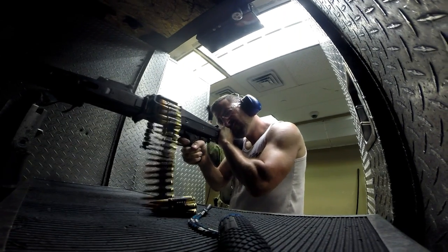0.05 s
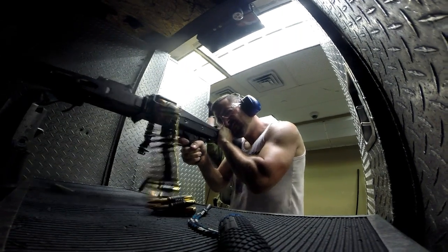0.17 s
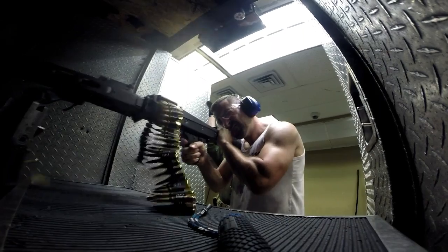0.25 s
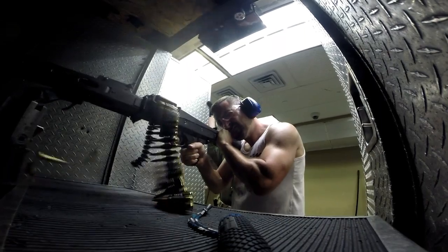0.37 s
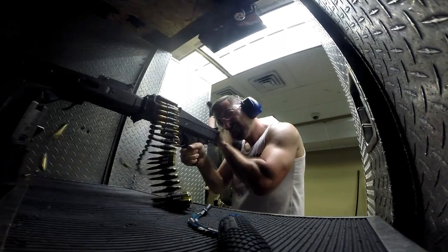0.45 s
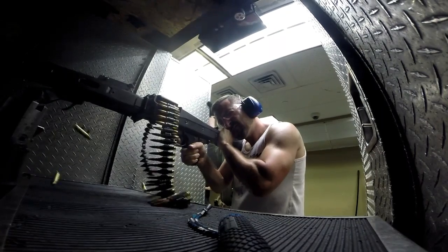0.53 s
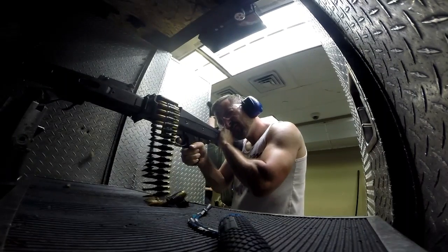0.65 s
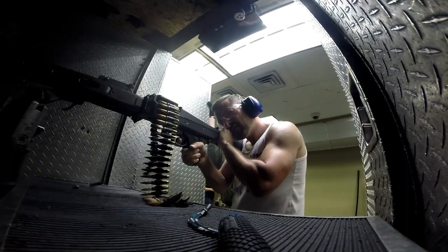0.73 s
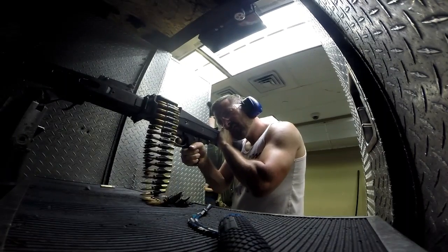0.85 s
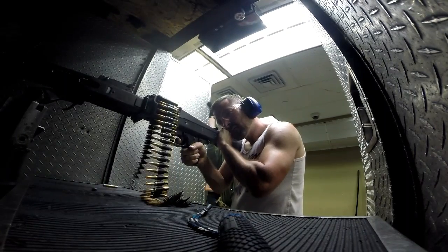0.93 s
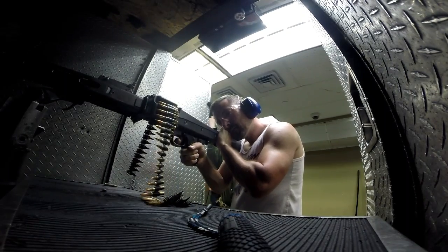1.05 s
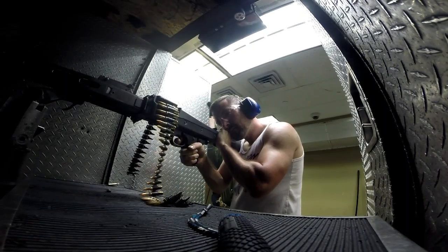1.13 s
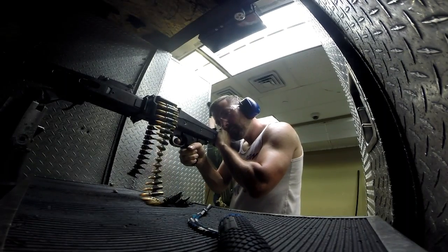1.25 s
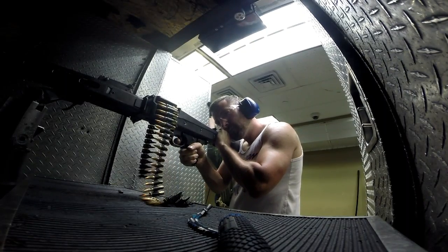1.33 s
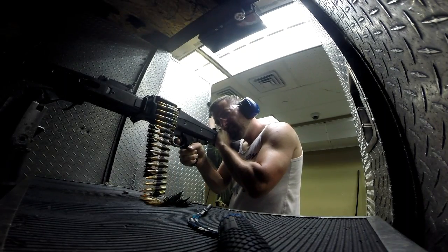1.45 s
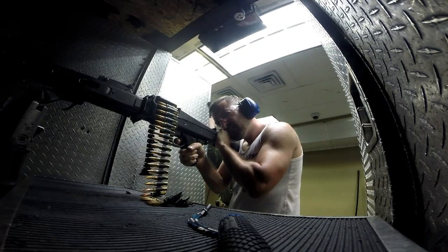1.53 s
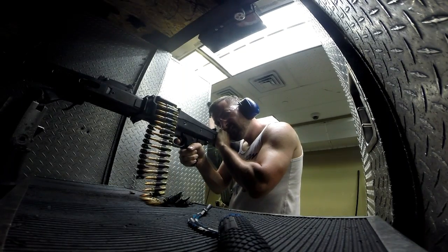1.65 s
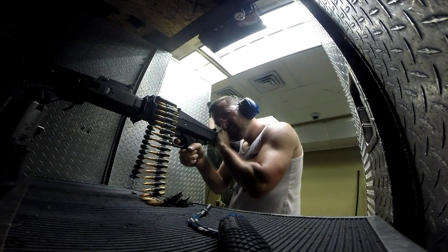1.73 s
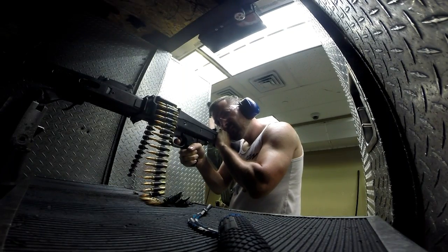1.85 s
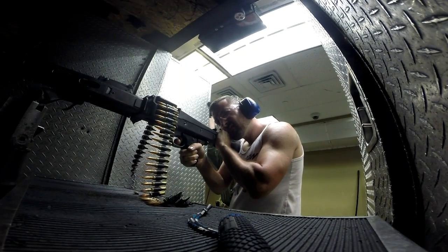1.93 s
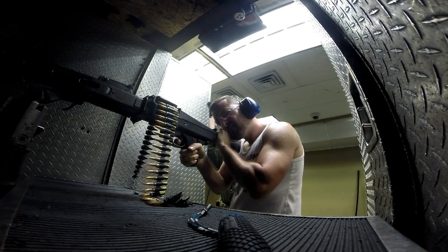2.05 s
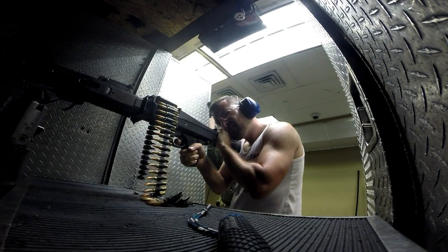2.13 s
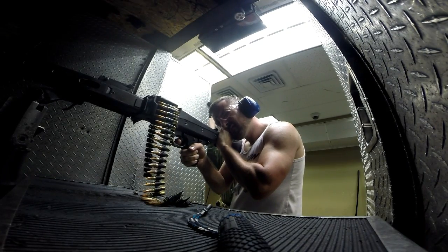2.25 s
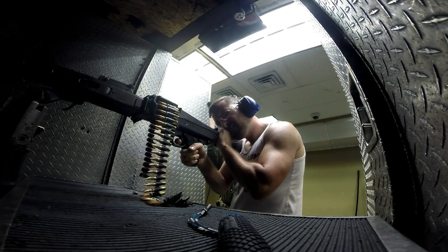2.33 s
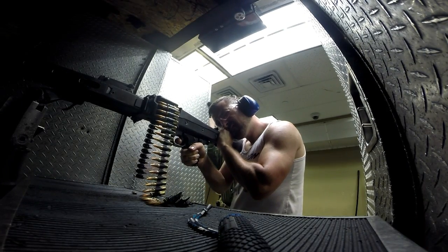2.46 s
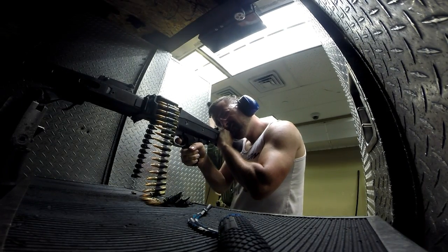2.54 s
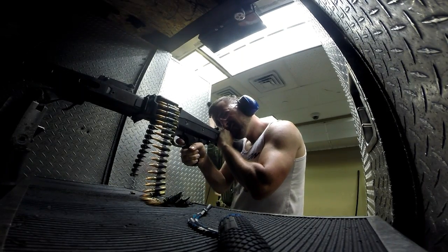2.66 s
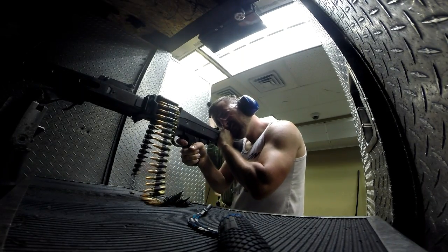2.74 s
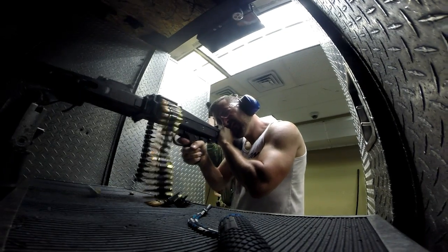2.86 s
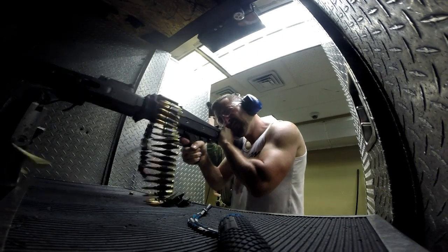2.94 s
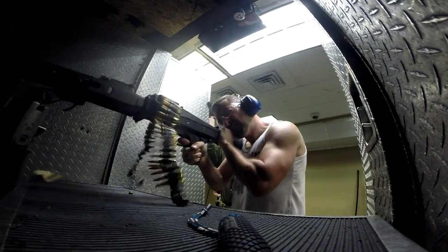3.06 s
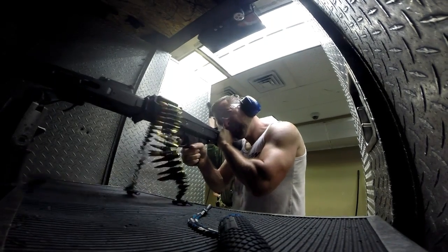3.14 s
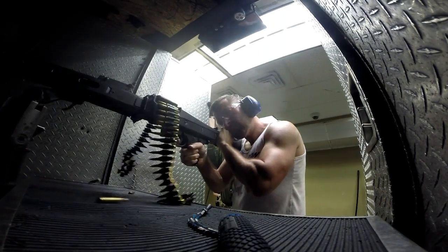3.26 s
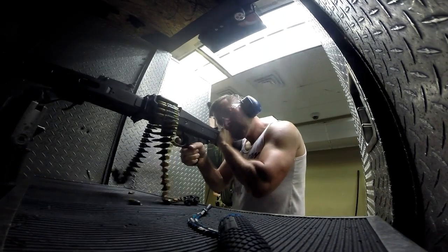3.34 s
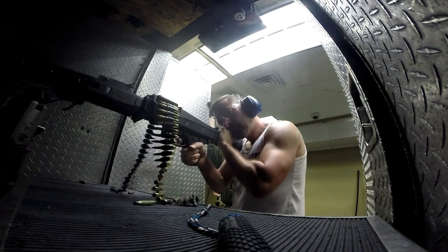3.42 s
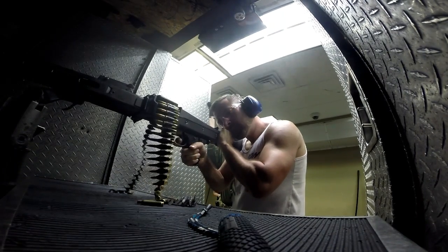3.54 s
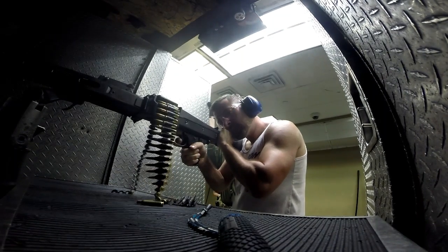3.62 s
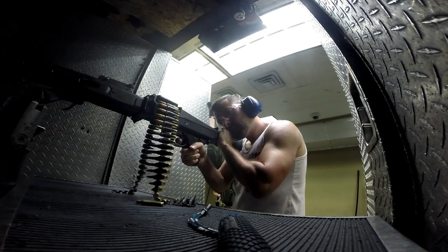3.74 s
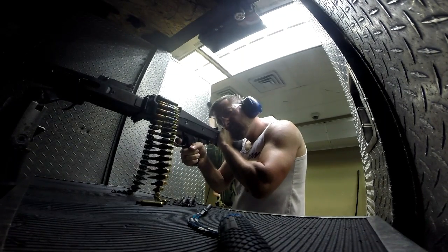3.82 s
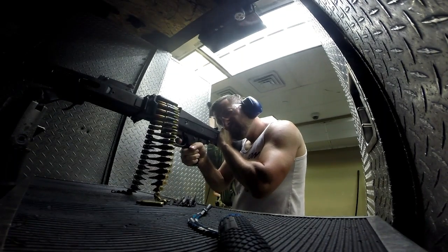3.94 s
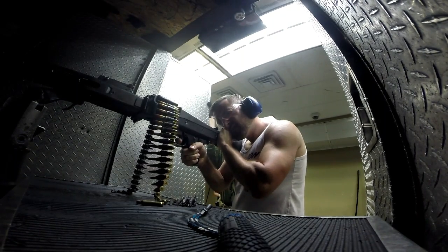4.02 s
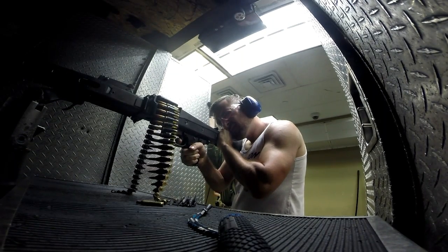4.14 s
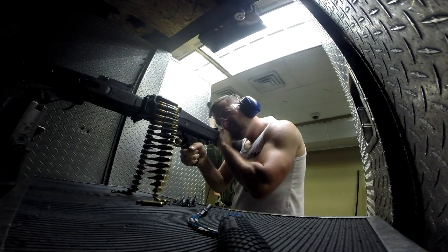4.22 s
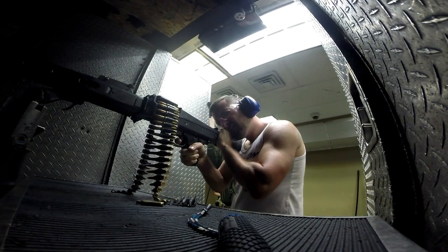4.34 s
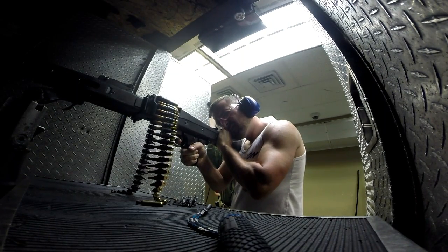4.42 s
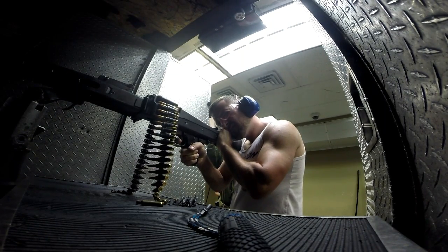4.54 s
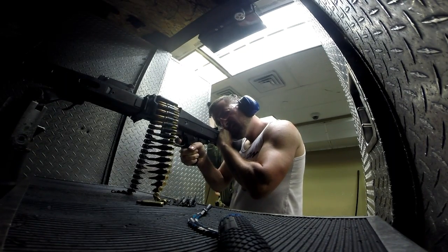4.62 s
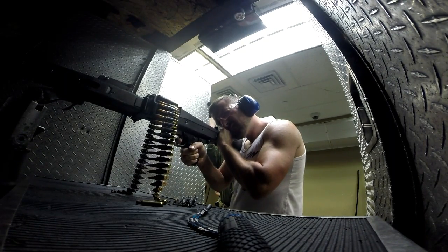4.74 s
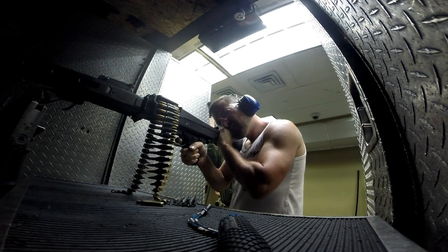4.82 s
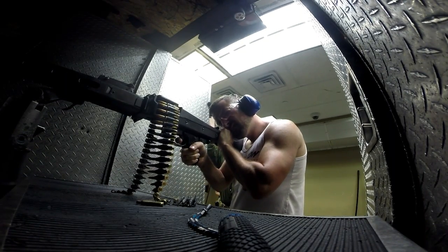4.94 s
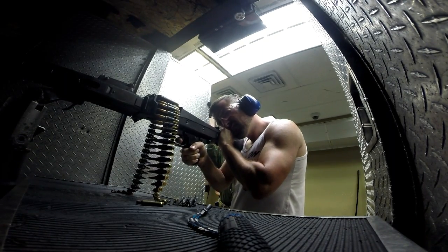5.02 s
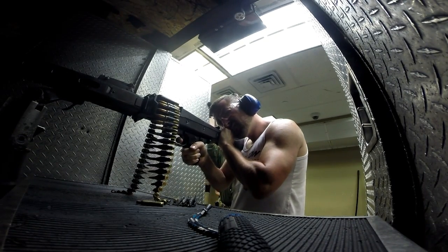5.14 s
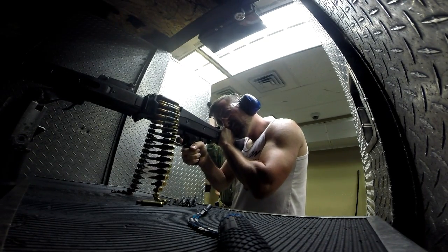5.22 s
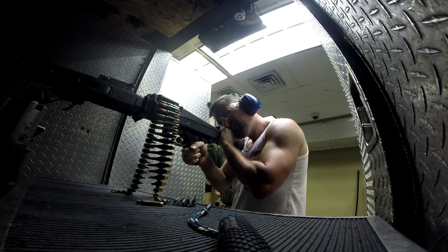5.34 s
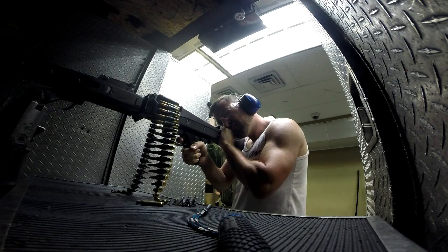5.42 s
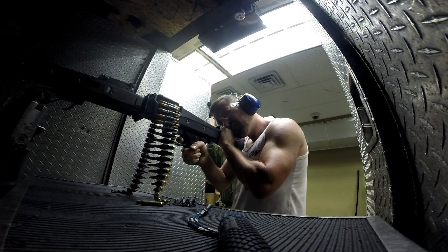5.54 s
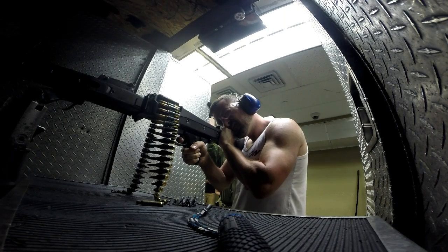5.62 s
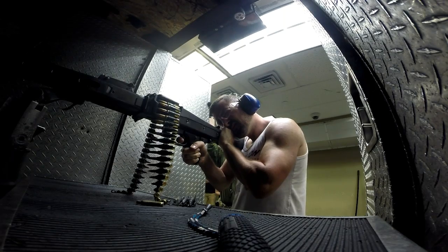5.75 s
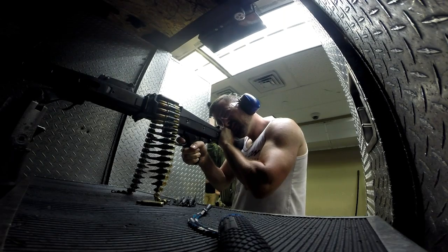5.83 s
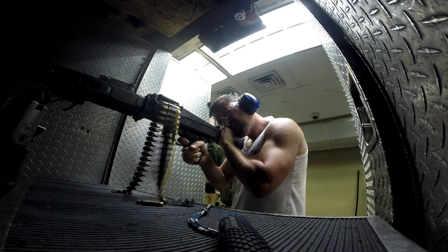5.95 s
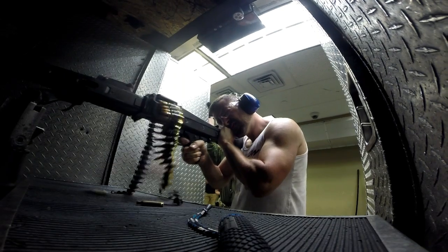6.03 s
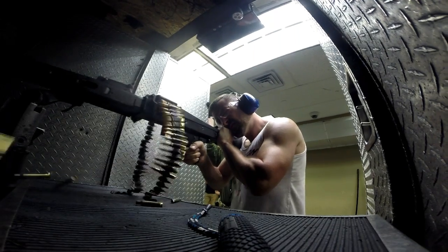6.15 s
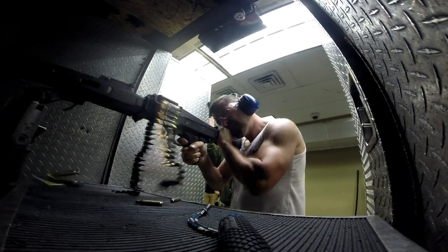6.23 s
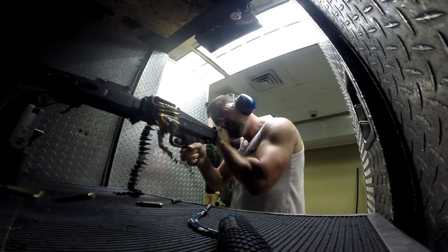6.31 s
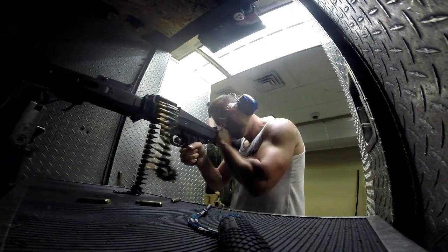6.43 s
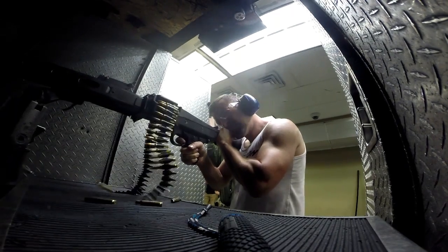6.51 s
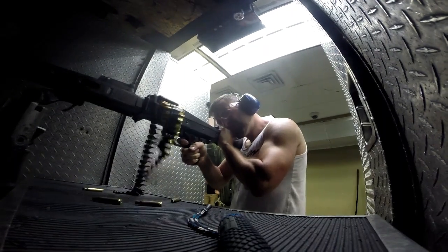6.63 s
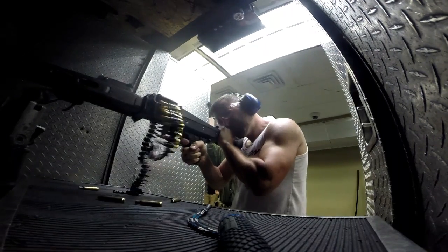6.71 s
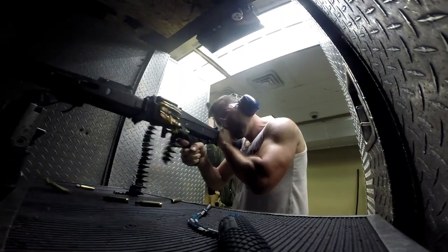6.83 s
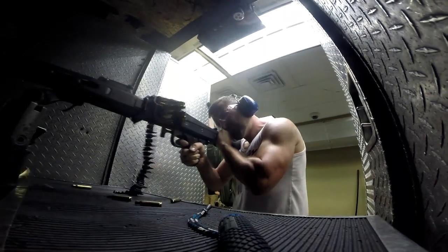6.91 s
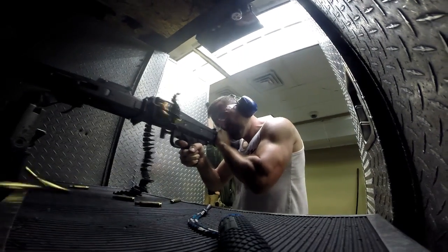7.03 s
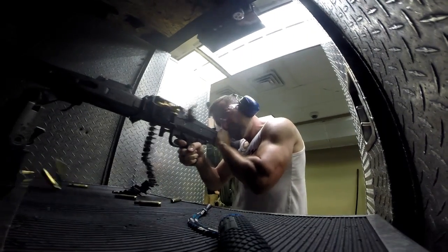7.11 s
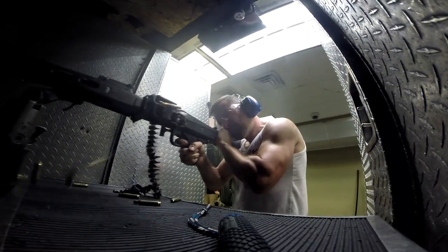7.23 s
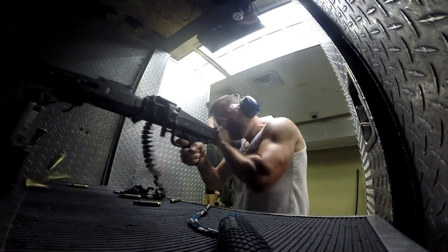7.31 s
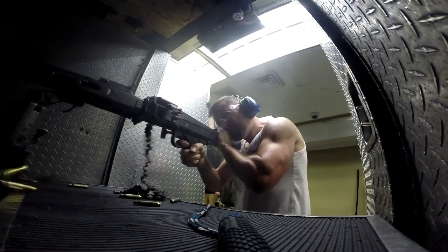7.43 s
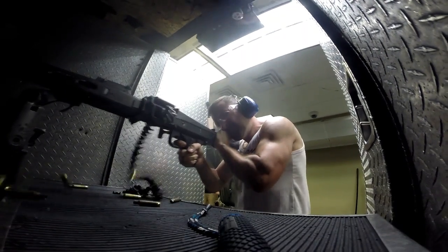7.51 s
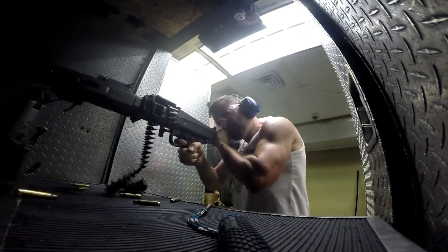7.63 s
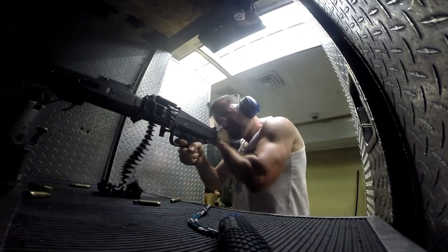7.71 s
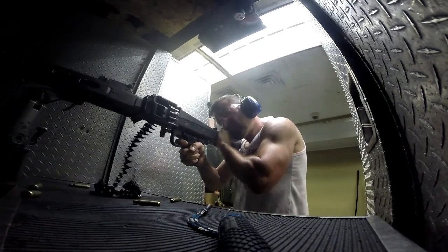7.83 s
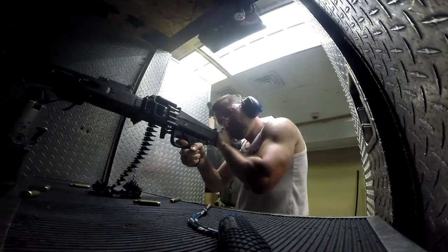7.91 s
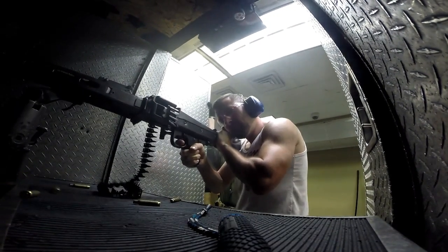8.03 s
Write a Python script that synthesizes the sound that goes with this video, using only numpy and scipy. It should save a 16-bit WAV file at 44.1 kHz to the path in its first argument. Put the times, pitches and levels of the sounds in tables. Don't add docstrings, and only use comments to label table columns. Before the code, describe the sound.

A belt-fed machine gun fires rapid distorted bursts in a steel indoor range booth, each ringing out into belt clatter, faint brass clinks and low rumble.

```python
import sys
import numpy as np
from scipy import signal
from scipy.fft import rfft, irfft, next_fast_len
from scipy.io import wavfile
from scipy.ndimage import uniform_filter1d

SR = 44100
rng = np.random.default_rng(int(sys.argv[2]) if len(sys.argv) > 2 else 0)


def pcm_store(signal):
    levels = np.round(np.clip(np.atleast_2d(signal), -1, 1) * 32767)
    wavfile.write(sys.argv[1], SR, levels.astype(np.int16).T)


def attenuation_scalar(level_db):
    decades = np.asarray(level_db, float) / 20
    return 10 ** decades


N = 355887

# time in seconds, peak in dB.
OPENING = [
    (0.1297, -12),
    (2.9227, -13),
    (6.088, -14),
    (6.7319, -17),
]
# time in seconds, peak in dB.
FOLLOWING = [(0.1879, -0.5), (0.248, -1), (0.308, -1), (0.37, -2), (0.4284, -3), (2.981, 0.5),
             (3.0402, -1.5), (3.1004, -2), (3.1642, 1.5), (3.224, -2), (6.147, -1), (6.209, -2),
             (6.2711, -2.5), (6.3297, -2), (6.394, -2), (6.789, -3), (6.853, -3), (6.912, -0.5),
             (6.9739, -2), (7.0353, -3), (7.096, -3), (7.1588, -2), (7.2255, -2), (7.2839, -0.5),
             (7.3456, -5.5), (7.4053, -3), (7.467, -2.5), (7.5262, -2.5), (7.5882, -4.5), (7.65, -4)]
SHOTS = sorted(OPENING + FOLLOWING)
# time in seconds, peak in dB.
FAR_SHOT = [(5.2318, -2)]
# start in Hz, top in Hz, level over the ring in dB.
SWEEPS = [(1007, 2600, 5.5), (997, 2300, 1), (912, 3000, 3), (980, 1100, 4)]
# frequency in Hz, width in Hz, level in dB.
CASE_MODES = [(1226, 540, 1.5), (1840, 500, -3.5), (2590, 700, -2.5), (3400, 706, -12.5),
              (5070, 550, -12.5), (282, 1440, -13.5)]
# frequency in Hz, width in Hz, level in dB.
BOOTH_AIR = [(767, 17, 12.5), (997.4, 25.4, 6), (1130, 76, 4), (1573, 54, 2.5), (1964, 22.4, 7),
             (2334, 70, 6)]
# delay in seconds, level in dB.
WALL_ECHOES = [(0.0098, -12.5), (0.016, -11), (0.018, -10), (0.022, -17.5), (.0275, -46), (.035, -36),
               (0.045, -27.5)]
# frequency in Hz, spread in Hz, level in dB, T60 in seconds.
PANELS = [(542.3, 17, -42.5, 3.26), (716.3, 13, -39.5, 3.42), (1290, 75, -27, 2.2), (1218, 30, -37, 1.2),
          (2230, 170, -41.5, 3.1), (97.3, 10, -19, 0.73), (963, 25, -34.5, 0.46)]

# frequency in Hz, level in dB.
HALL_SPECTRUM = [(110, -19), (180, -4), (239, -9), (367, -4.5), (460, -3.5), (506, -3.5), (922, -10.5),
                 (1270, -3), (1470, -13.5), (2540, -13.5), (3630, -25.5), (4140, -21.5), (8450, -37),
                 (14300, -47), (16000, -55.5)]
# frequency in Hz, T60 in seconds.
HALL_T60 = [(200, 1.45), (500, 1.116), (1300, 1.06), (3000, 1.084), (6000, 0.83), (15000, 0.58)]
# frequency in Hz, level in dB.
FAR_SPECTRUM = [(35, -31), (60, -23), (85, -0.5), (124, -26), (250, -4), (294, -10), (593, -7.5), (666, -7),
                (767, -7), (1280, -2.5), (1780, -19.5), (2350, -14), (16000, -50.5)]
# frequency in Hz, T60 in seconds.
FAR_T60 = [(100, 0.33), (300, 1), (1000, 1), (3000, 0.88), (8000, 0.69)]

# start in seconds, travel in seconds, final level in dB.
BOLT_RUNS = [
    (0.077, 0.036, -24.5),
    (2.871, 0.043, -25.5),
    (6.036, 0.0392, -29),
]
# start in seconds, length in seconds, scrape in dB, low shove in dB.
LOCKS = [
    (0.1123, 0.0094, -14.5, -15),
    (2.908, 0.011, -24.5, -30),
    (6.073, 0.0045, -26.5, -34),
]
# time in seconds, level in dB.
FEED_SNAPS = [(0.273, -21), (0.3254, -30), (0.3991, -30), (2.9477, -23), (3.0656, -28.5), (3.193, -23.5),
              (6.1138, -27), (6.1762, -28.5), (6.2342, -30), (6.2912, -32.5), (6.3602, -24), (6.7573, -25),
              (6.8818, -23), (6.999, -29), (7.0532, -34), (7.121, -22), (7.1799, -35), (7.376, -27),
              (7.4304, -23), (7.5547, -27), (7.608, -36.5), (7.6676, -25)]
# start in seconds, length in seconds, level in dB.
BELT_SLIDES = [(1.215, 0.025, -35.5), (1.269, 0.022, -42), (1.338, 0.16, -41), (1.604, 0.05, -48.5),
               (3.79, 0.033, -46), (3.86, 0.025, -55), (4.205, 0.046, -57), (4.328, 0.02, -63),
               (4.363, 0.079, -59), (4.565, 0.093, -63), (7.88, 0.012, -32.5), (7.915, 0.014, -40)]
# time in seconds, peak in dB, low part in dB, rise in seconds.
KNOCKS = [(0.56, -7.5, 6.5, 0.003), (0.6527, -16, 4, 0.0023), (0.67, -2.5, 7, 0.0018),
          (0.692, -13, -10, 0.0037), (0.7498, -19.5, 13, 0.0059), (0.849, -20, 17, 0.0031),
          (1.2204, -12.5, 8, 0.0058), (1.264, -21.5, -2, 0.0091), (1.353, -19, 4, 0.0051),
          (2.097, -27.5, 3, 0.0086), (2.8828, -13, -10, 0.0015), (3.19, -13, 2, 0.0019),
          (3.286, -12, 4.5, 0.003), (3.7646, -20, 7, 0.0046), (3.803, -24, 6.5, 0.0053),
          (6.0387, -23.5, -14, 0.0058), (7.885, -11, 3, 0.0032), (7.897, -17, 12, 0.0021),
          (7.94, -17, 13, 0.0034), (7.948, -21, 10, 0.0015), (7.9245, 0, 4, 0.0036)]
# time in seconds, peak in dB, low part in dB.
TAPS = [(0.868, -37, 19), (1.0254, -36, 19.5), (1.0993, -40.5, 24.5), (1.3805, -26, 10), (1.407, -31.5, 1),
        (1.4425, -31.5, 20), (1.6103, -35, 2), (1.722, -41.5, 13.5), (1.7946, -43, 9), (1.851, -40.5, 4),
        (1.923, -45, 10), (2.0154, -39.5, 8.5), (2.3434, -44, -13), (2.5344, -32.5, 3), (2.732, -44.5, -5),
        (3.6782, -32, 3), (3.8686, -36.5, 17), (4.221, -31, -1), (4.2745, -39, 4), (4.322, -37, 3),
        (4.3994, -42, 0), (4.62, -34.5, -2), (4.8302, -41, -4), (4.9333, -43, -2), (4.984, -44, -10),
        (0.902, -39, 16), (1.158, -47, 25), (1.284, -33, 0), (1.47, -31, 11), (1.497, -35, 0),
        (2.495, -46, 0), (3.657, -27, 2), (3.733, -43, 0), (4.068, -44.5, -5), (4.088, -43, -5),
        (4.137, -46, -5), (4.386, -44.5, 0), (4.532, -48, -5), (4.587, -42.5, 0), (6.5772, -33, 17),
        (7.9658, -21, 11)]
TAP_RISE_S = 0.0059
# frequency in Hz, width in Hz, level in dB.
LINK_MODES = [(2800, 130, -14.5), (4080, 190, 17), (4750, 280, 12.5), (5360, 215, 7.5), (6180, 200, -2.5),
              (9000, 7600, -26.5)]
# frequency in Hz, width in Hz, level in dB.
BENCH_MODES = [(780, 640, -6.5), (1525, 387, 1.5), (1887, 550, -3.5), (2533, 320, -1.5)]

# time in seconds, peak in dB, low mode in Hz, high mode in Hz, high mode in dB.
CLINKS = [(0.0094, -53, 9000, 12900, -14), (1.3088, -45, 8110, 12100, -18), (1.612, -55, 8850, 14200, 11),
          (1.6294, -48.5, 8820, 14000, 5), (1.7194, -54, 8820, 12200, -3), (1.851, -54, 8650, 12200, -22),
          (2.0172, -64.5, 8860, 10800, -19), (2.098, -42.5, 8570, 11160, -2.5),
          (2.3394, -64, 8970, 10830, 12), (2.494, -53.5, 9100, 12120, -4), (2.536, -42, 9000, 11536, -4),
          (2.734, -45.5, 8950, 12129, -17), (3.678, -61, 8860, 14100, 12),
          (3.7883, -56, 7950, 14100, -13.5), (4.137, -51, 7630, 11600, -25), (4.22, -39.5, 8600, 13850, -1),
          (4.223, -46, 11500, 14126, 12), (4.3576, -47, 9050, 13900, -9), (4.3994, -49, 8700, 14200, 0),
          (4.5345, -53, 8600, 14100, -2), (4.5645, -51, 8950, 11200, 8), (4.624, -44, 7250, 13900, 3),
          (4.9357, -65, 7500, 11200, 7), (7.9923, -50.5, 8450, 14300, -18)]
# frequency in Hz, level in dB.
BRASS_MODES = [(7700, 3), (8800, 3.5), (10150, -5.5), (11550, -8), (12150, -22), (12700, 2), (14150, -5.5)]
# time in seconds, frequency in Hz, peak in dB, T60 in seconds.
PINGS = [(2.565, 6210, -47, .08), (3.79, 8140, -54, .7), (4.56, 3500, -58, .2), (4.765, 2600, -52, .45),
         (4.565, 15100, -64, .3), (4.273, 1680, -34, .04), (.562, 820, -22, .05), (.67, 1280, -15, .06),
         (.851, 1520, -21, .06), (1.068, 1070, -29, .08), (2.886, 2600, -19, .025), (3.762, 4200, -35, .07),
         (3.801, 4200, -35, .07), (1.222, 1500, -21, .06), (1.355, 5380, -47, .15), (1.405, 5380, -47, .25),
         (2.5, 12715, -72, .5), (2.735, 12720, -74, .4), (2.28, 8820, -68, .4), (4.76, 5100, -60, .15),
         (3.96, 11200, -66, .4)]
# start in seconds, length in seconds, level in dB.
ROLLS = [
    (1.598, 1.25, -77),
    (3.949, 1.1, -79),
]
BRASS_FLUTTER_DB = 3

# frequency in Hz, level in dB.
FAN_SPECTRUM = [(100, -43), (200, 3.5), (620, -6), (1260, -4.5), (1830, -8), (2900, -8.5), (3500, -15.5),
                (7000, -24), (9000, -32.5), (16000, -42)]
# level after a blast in dB, T60 in seconds,
# extra cut under the limiter from 0 to 1, level after the far shot in dB, fan floor in dB.
BUILDING_MODES = [
    (-28.5, 3.6, 0.09, -65, -49.5),
    (-23, 2.69, 0, -57, -48.5),
    (-29, 2.6, 0.18, -39, -61.5),
]
# time in seconds, level in dB.
THUDS = [(0.14, -33), (0.74, -22), (1.1, -30), (1.42, -33), (1.8, -34.5), (2.3, -48), (3.52, -36),
         (4.55, -49), (6.602, -32.5)]
# start in seconds, length in seconds, frequency in Hz, level in dB.
DUCT_HUMS = [(0.779, 0.11, 113, -33.5), (1.06, 0.14, 150.5, -35.5), (1.66, 0.08, 175.5, -44),
             (2.246, 0.097, 95.6, -40.5), (3.468, 0.087, 101, -31), (1.804, 0.088, 185, -43.5),
             (2.109, 0.11, 196, -45), (2.83, 0.08, 179, -42), (5.537, 0.18, 96, -44),
             (5.642, 0.356, 221, -46.5), (7.701, 0.26, 267, -38)]


def unit(x):
    return x / np.sqrt(np.mean(x ** 2) + 1e-20)


def along(points, hz):
    f, v = np.transpose(points)
    return np.interp(np.log(hz + 1), np.log(f + 1), v)


def filtered(x, response):
    m = next_fast_len(len(x) + 8192)
    return irfft(rfft(x, m) * response(np.fft.rfftfreq(m, 1 / SR)), m)[:len(x)]


def noise(spectrum):
    return unit(filtered(rng.standard_normal(N), lambda hz: attenuation_scalar(along(spectrum, hz))))


def modes(table):
    def response(f):
        total = 0
        for k, (centre, width, db) in enumerate(table):
            damping = 1j * f * width
            total = total + (-1) ** k * attenuation_scalar(db) * damping / (centre * centre - f * f + damping)
        return total
    return response


def response_rms(response):
    return np.sqrt(np.mean(abs(response(np.fft.rfftfreq(4096, 1 / SR))) ** 2))


def add(track, s, sound):
    part = track[round(s * SR):][:len(sound)]
    part += sound[:len(part)]


def flutter(count, depth_db, size):
    slow = uniform_filter1d(rng.standard_normal(count), size=size)
    return attenuation_scalar(depth_db * unit(uniform_filter1d(slow, size=size)))


def rough_grit(depth_db, size):
    roughness = unit(uniform_filter1d(rng.standard_normal(N), size=size))
    return unit(rng.standard_normal(N) * attenuation_scalar(depth_db * roughness))


def stroke_db(start, attack, length, fade_db_per_s):
    age = np.arange(N) / SR - start
    rise = -40 * np.maximum(1 - age / attack, 0)
    fade = fade_db_per_s * np.maximum(age - length, 0)
    return np.where(age > 0, rise - fade, -150)


def since_blast(lag=0):
    t, starts = np.arange(N) / SR, np.array(SHOTS)[:, 0] + lag
    last = np.searchsorted(starts, t) - 1
    return np.where(last >= 0, t - starts[last], 99)


def limiter_db():
    depth_db, hold_s, recover_db_per_s = 21, 0.00097, 62
    recovered = recover_db_per_s * np.maximum(since_blast(lag=0.00646) - hold_s, 0)
    return uniform_filter1d(np.minimum(0, recovered - depth_db), size=50)


def background():
    boom = noise([(15, -47.0), (30, -16.5), (50, -0.5), (70, -5.5), (90, -61), (200, -120)])
    thrum = noise([(40, -55.5), (72, 4.5), (95, 12.5), (135, -1.0), (170, -17.0), (400, -120)])
    drone = noise([(80, -65.5), (140, 8.5), (200, 3.5), (250, -11.0), (320, -43), (700, -120)])
    thud_rise_s, thud_t60, thud_tilt_db = 0.12, 1, -2.5
    since, duck_db, far_s = since_blast(), limiter_db(), FAR_SHOT[0][0]
    after_far = np.arange(N) / SR > far_s
    thuds = 0
    for s, db in THUDS:
        thuds = thuds + attenuation_scalar(2 * (db + stroke_db(s - thud_rise_s, thud_rise_s, thud_rise_s, 60 / thud_t60)))
    total = attenuation_scalar(-53 - 3 * after_far) * noise(FAN_SPECTRUM)
    for k, (band, row) in enumerate(zip((boom, thrum, drone), BUILDING_MODES)):
        near_db, t60, extra, far_db, floor_db = row
        near = attenuation_scalar(2 * (near_db - 60 * since / t60 + (0.5 + extra) * duck_db))
        near = uniform_filter1d(near, size=901, origin=450)
        far = attenuation_scalar(2 * (far_db + stroke_db(far_s, 0.064, 0.13, 60 / t60)))
        hush_db = -12 * (k == 0) * after_far
        fan_floor = attenuation_scalar(2 * (floor_db + hush_db))
        energy = abs(near) + far + attenuation_scalar(2 * k * thud_tilt_db) * thuds + fan_floor
        total += np.sqrt(energy) * band
    return total


def hums():
    track = np.zeros(N)
    for s, span, hz, db in DUCT_HUMS:
        duct = modes([(hz, 16, 0)])
        note = unit(filtered(rng.standard_normal(SR // 2), lambda f: duct(f) ** 2))
        add(track, s, attenuation_scalar(db + stroke_db(0, 0.04, span, 249)[:SR // 2]) * note)
    return track


def reverb(events, spectrum, t60, rise, early_db, early_t60):
    hz, t, z = signal.stft(rng.standard_normal(N), SR, nperseg=256)
    energy = np.zeros(z.shape)
    for s, db in events:
        age = t[t > s] - s
        late = attenuation_scalar(-120 * age / along(t60, hz)[:, None])
        early = attenuation_scalar(2 * early_db - 120 * age / early_t60)
        energy[:, t > s] += attenuation_scalar(2 * db) * (1 - np.exp(-age / rise)) * (late + early)
    diffuse = signal.istft(z * np.sqrt(energy), SR, nperseg=256)[1][:N]

    def gain(f):
        return attenuation_scalar(along(spectrum, f))
    return filtered(diffuse, gain) / response_rms(gain)


def hall():
    far_s = FAR_SHOT[0][0]
    even = [(s, 0) for s, _ in SHOTS]
    kicks = np.zeros(N)
    kicks[[round(s * SR) for s, _ in SHOTS]] = 1
    kicks[round(far_s * SR)] = attenuation_scalar(-17.5)
    total = attenuation_scalar(-8.5) * reverb(even, HALL_SPECTRUM, HALL_T60, rise=0.0016, early_db=7.5, early_t60=0.23)
    far = reverb(FAR_SHOT, FAR_SPECTRUM, FAR_T60, rise=0.0057, early_db=8.5, early_t60=0.38)
    total += attenuation_scalar(-13.5) * far * (np.arange(N) > far_s * SR) * flutter(N, 1.6, size=70)
    for hz, spread_hz, db, t60 in PANELS:
        energy = signal.lfilter([1], [1, -np.exp(-2 * np.log(1000) / t60 / SR)], kicks)
        plate = unit(filtered(rng.standard_normal(N), modes([(hz, spread_hz, 0)])))
        total += attenuation_scalar(db) * np.sqrt(energy) * plate
    return total


def jingle():
    track, t = np.zeros(N), np.arange(SR // 3) / SR
    shared_hz, shared_db = np.transpose(BRASS_MODES)
    for start, span, db in ROLLS:
        for when, pick, detune, size in rng.random((64, 4)):
            k = int(pick * len(BRASS_MODES))
            tone = np.sin(2 * np.pi * shared_hz[k] * (.995 + .01 * detune) * t)
            decay = attenuation_scalar(db + shared_db[k] + 10 * size - 60 * t / 0.323)
            add(track, start + when * span, decay * tone * flutter(len(t), BRASS_FLUTTER_DB, size=350))
    return track


def brass():
    track, t = np.zeros(N), np.arange(SR // 2) / SR
    shared_hz, shared_db = np.transpose(BRASS_MODES)[:, :, None]
    for s, db, low_hz, high_hz, high_db in CLINKS:
        chance = rng.standard_normal((2, len(BRASS_MODES), 1))
        ring = np.sin(2 * np.pi * low_hz * t) + attenuation_scalar(high_db) * np.sin(2 * np.pi * high_hz * t)
        level = attenuation_scalar(shared_db - 14 + 6 * np.clip(chance[0], -3, 1.2))
        ring += np.sum(level * np.sin(2 * np.pi * shared_hz * (1 + .006 * chance[1]) * t), axis=0)
        ring *= flutter(len(t), BRASS_FLUTTER_DB, size=350)
        tick = 4 * uniform_filter1d(rng.standard_normal(len(t)), size=3) * attenuation_scalar(-60 * t / 0.036)
        add(track, s, attenuation_scalar(db - 11.0) * (ring * attenuation_scalar(-60 * t / 0.33) + np.diff(tick, prepend=0)))
    for s, hz, db, t60 in PINGS:
        add(track, s, attenuation_scalar(db - 60 * t / t60) * np.sin(2 * np.pi * hz * t) * flutter(len(t), 2, size=160))
    return track


def clicks():
    track, spray, t = np.zeros(N), np.zeros(N), np.arange(SR // 10) / SR
    tap_click_db, knock_click_db = -5.5, -17.5
    puff_db, puff_t60 = -6.5, 0.057
    touches = [(s, db + tap_click_db) for s, db, _ in TAPS]
    touches += [(s + rise / 2, db + knock_click_db) for s, db, _, rise in KNOCKS]
    for s, db in touches:
        grains = rng.standard_normal((2, len(t)))
        add(track, s, attenuation_scalar(db - 60 * t / 0.009) * grains[0])
        add(spray, s, attenuation_scalar(db - tap_click_db + puff_db - 60 * t / puff_t60) * grains[1])
    contact = modes([(4500, 5000, 2)])
    sharp = filtered(track, lambda f: contact(f) / (1 + 1j * f / 9000))
    return sharp + filtered(spray, modes([(2300, 2100, 2.5), (6390, 2700, -2)]))


def links():
    high, low, t = np.zeros(N), np.zeros(N), np.arange(SR // 8) / SR
    for s, db, low_db, rise in KNOCKS + [(*tap, TAP_RISE_S) for tap in TAPS]:
        u = t / rise
        envelope = u * np.exp(1 - u) + 1.5 * np.exp(-4 * u)
        burst = rng.standard_normal(len(t)) * envelope
        add(high, s, attenuation_scalar(db - 18.0) * burst)
        add(low, s, attenuation_scalar(db + low_db - 17.5) * burst)
    for s, _ in SHOTS:
        add(high, s, attenuation_scalar(-29 - 60 * t / 0.078) * rng.standard_normal(len(t)))
    snap_s = 0.0023
    for s, db in FEED_SNAPS:
        snap = attenuation_scalar(db + 0.5) * np.exp(-(t / snap_s - 2) ** 2)
        add(high, s - 2 * snap_s, snap * rng.standard_normal(len(t)))
    drag = sum(attenuation_scalar(db + stroke_db(s, 0.0056, span, 288)) for s, span, db in BELT_SLIDES)
    drag = drag * rough_grit(2.2, size=130)
    high += attenuation_scalar(-9) * drag
    low += attenuation_scalar(6.5) * drag
    upper, lower = modes(LINK_MODES), modes(BENCH_MODES)
    return filtered(high, upper) / response_rms(upper) + filtered(low, lower) / response_rms(lower)


def bolt():
    grit = rough_grit(1.7, size=90)
    steel = modes([(1190, 710, 1.0), (2640, 480, 5.5), (4320, 2400, -0.5), (7140, 4200, -10.0)])
    t, travel, shove = np.arange(N) / SR, np.zeros(N), np.zeros(N)
    for s, span, db in BOLT_RUNS:
        speed_db = 8.5 * np.clip((t - s) / span - 1, -1, 0)
        travel += attenuation_scalar(db + 10.0 + stroke_db(s, 0.0036, span, 7000) + speed_db)
    for s, span, db, low_db in LOCKS:
        travel += attenuation_scalar(db + 2.5 + stroke_db(s, 0.0014, span, 6500))
        shove += attenuation_scalar(low_db) * np.sin(2 * np.pi * np.clip((t - s) / span, 0, 1))
    pin_s, pin_db = 2 * 0.0067, -21.5 + 12.5
    for s, _ in OPENING:
        travel += attenuation_scalar(pin_db + stroke_db(s - pin_s, pin_s, pin_s, 9000))
    return filtered(travel * grit, steel) + shove


def case_response(shared, chance, s):
    t = np.arange(len(shared)) / SR
    table = [(hz * (1 + a), width, db + b) for (hz, width, db), (a, b) in zip(CASE_MODES, chance)]
    shape = attenuation_scalar(-60 * np.maximum(t - 0.0013, 0) / 0.043)
    wave = filtered(shape * shared, modes(table))
    wave = wave / np.std(wave[:SR // 200])
    ring_hz, ring_t60 = 1177.6 * (1 + chance[0, 0]), 0.038
    wave += attenuation_scalar(chance[0, 1] - 60 * t / ring_t60) * np.sin(2 * np.pi * ring_hz * t)
    sweep_s = 0.005
    for (first_s, _), (from_hz, to_hz, sweep_db) in zip(OPENING, SWEEPS):
        if s == first_s:
            hz = np.interp(t, [0, sweep_s, 1.387 * sweep_s], [from_hz, to_hz, from_hz])
            wave += attenuation_scalar(sweep_db) * shape * np.sin(2 * np.pi * np.cumsum(hz) / SR)
    return wave


def blasts():
    track, t = np.zeros(N), np.arange(SR // 20) / SR
    common = rng.standard_normal(len(t))
    pulse = np.exp(-t / 0.00007) * (1 - t / 0.00009)
    echo = filtered(pulse, modes([(1163, 250, 5.5), (2403, 400, -1), (605, 5000, 2.5)]))
    air = filtered(pulse, modes(BOOTH_AIR))
    air /= abs(air).max()
    echo *= 1 - np.exp(-t / 0.00095)
    echo /= abs(echo).max()
    push_s, push_db = 0.0006, 4
    push = -attenuation_scalar(push_db) * np.sin(np.pi * np.minimum(t / push_s, 1))
    for s, db in SHOTS:
        fronts = 0.7 * common + 0.32 * rng.standard_normal(len(t))
        fronts[:14] = -2.62
        chance = rng.standard_normal((len(CASE_MODES), 2)) * [0.04, 2.5]
        wave = attenuation_scalar(16) * case_response(fronts, chance, s)
        squashed = np.where(wave > 0, 1.1 * np.tanh(wave / 7.1), 0.61 * np.tanh(wave / 2.66))
        gas_hiss = attenuation_scalar(-28.5 - 60 * t / 0.09) * np.diff(fronts, prepend=fronts[0])
        crack = attenuation_scalar(-52.0 - 60 * t / 0.0017) * np.diff(fronts, prepend=0)
        add(track, s, gas_hiss)
        add(track, s - .0002, attenuation_scalar(db + 17) * squashed)
        add(track, s, attenuation_scalar(7.5) * air + crack)
        add(track, s - push_s, push)
        for delay, echo_db in WALL_ECHOES:
            add(track, s + delay, attenuation_scalar(echo_db + 20.0 + rng.normal(0, 2.7)) * echo)
    return filtered(track, lambda f: 1j * f / (60 + 1j * f) / (1 + 1j * f / 7000))


def scene():
    quiet = background() + hums() + jingle() + brass() + clicks() + links() + bolt()
    return (hall() + blasts() + quiet / attenuation_scalar(limiter_db()))[None]


def roll_off(x):
    return signal.sosfilt(signal.butter(12, 16670, fs=SR, output="sos"), x)


def record(dry):
    order = np.array([4, 5, 7, 8, 9, 10, 11, 12])[:, None]
    port_hz = order * 1303

    def port(f):
        damping = 1j * f * 170
        return 1 + np.sum(.14 * order * damping / (port_hz ** 2 - f * f + damping), axis=0)
    x = filtered(dry[0], port)
    ceiling = np.where(x > 0, 6.9, 3.3)
    x = x / (1 + abs(x / ceiling) ** 4) ** (1 / 4)
    x = x * attenuation_scalar(limiter_db())
    x = x / (1 + abs(x) ** 12) ** (1 / 12)
    x = filtered(x, lambda f: (f < 15800) / (1 + (f / 17000) ** 2))
    return roll_off(x[None])


dry = scene()
out = record(dry)
pcm_store(out)
```